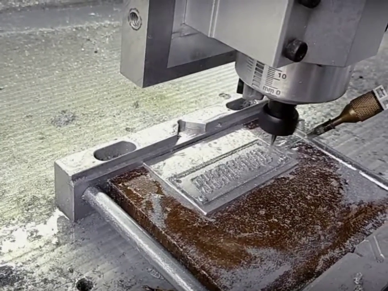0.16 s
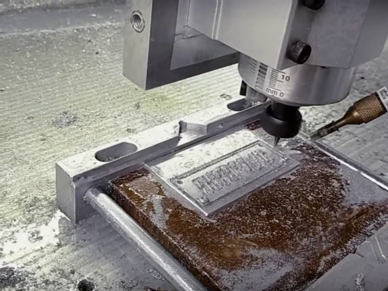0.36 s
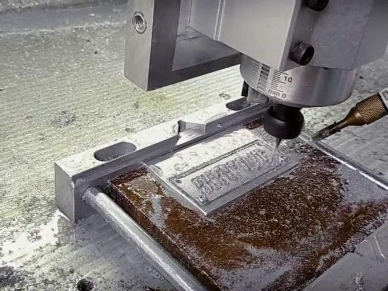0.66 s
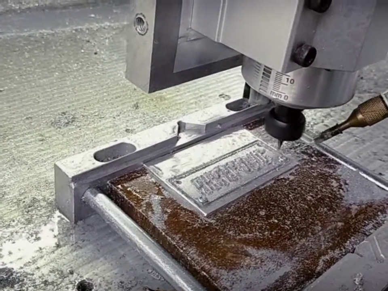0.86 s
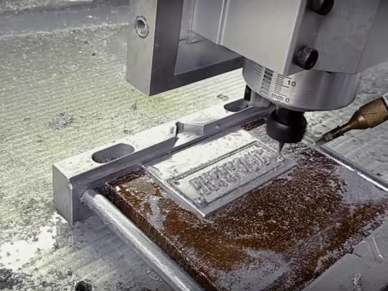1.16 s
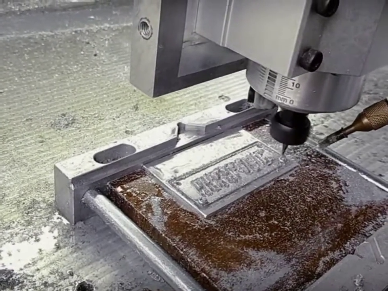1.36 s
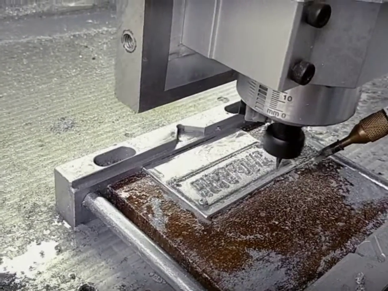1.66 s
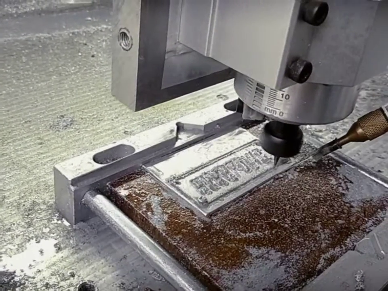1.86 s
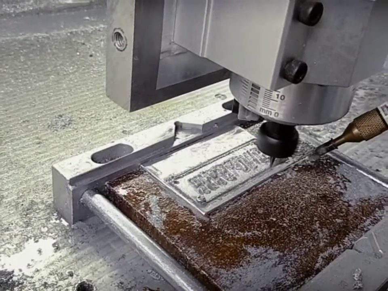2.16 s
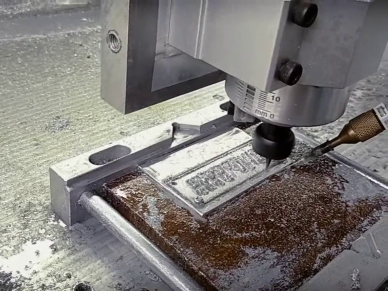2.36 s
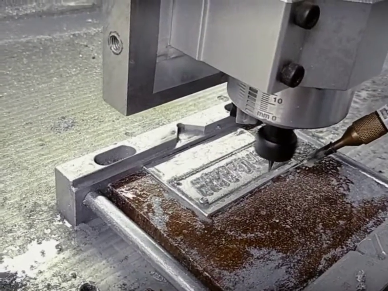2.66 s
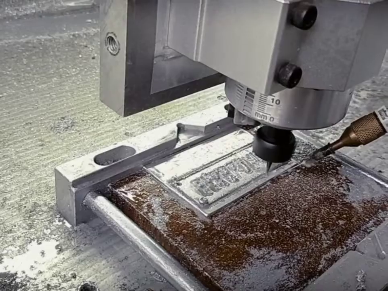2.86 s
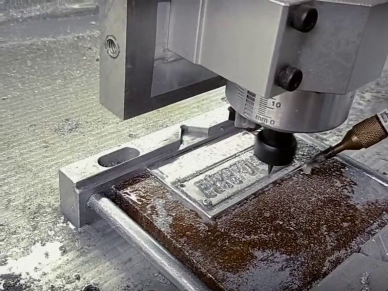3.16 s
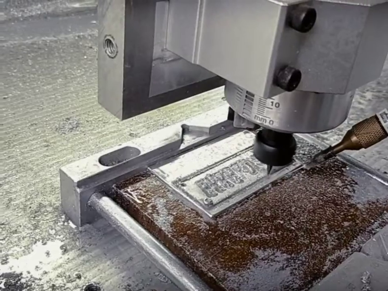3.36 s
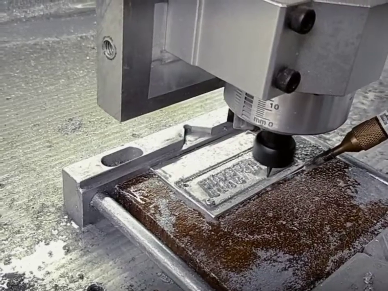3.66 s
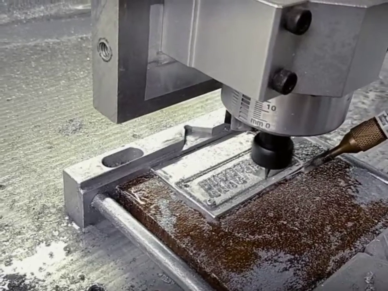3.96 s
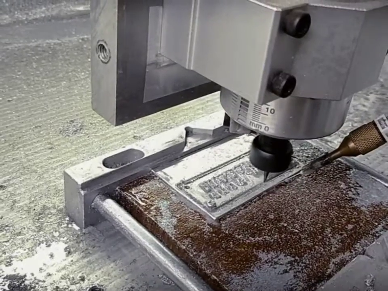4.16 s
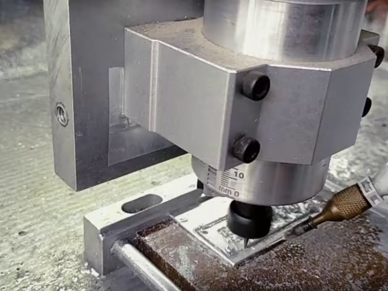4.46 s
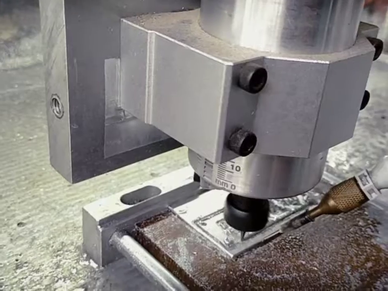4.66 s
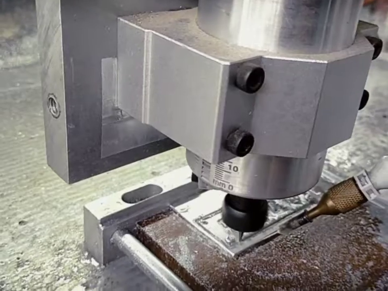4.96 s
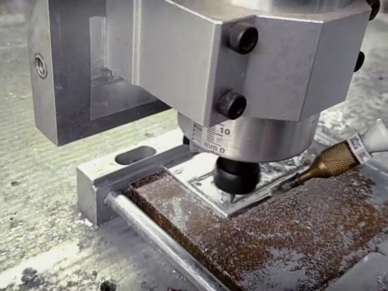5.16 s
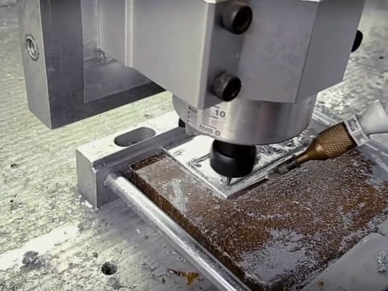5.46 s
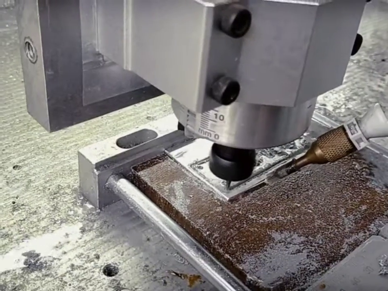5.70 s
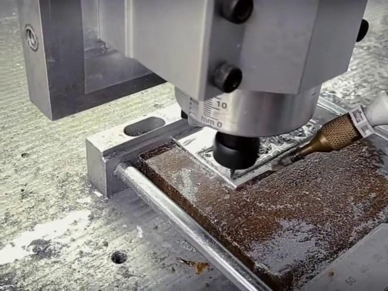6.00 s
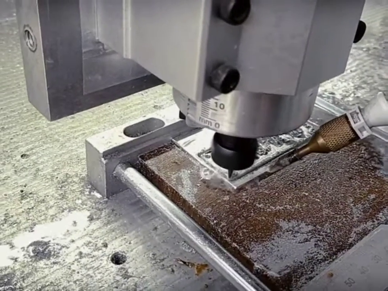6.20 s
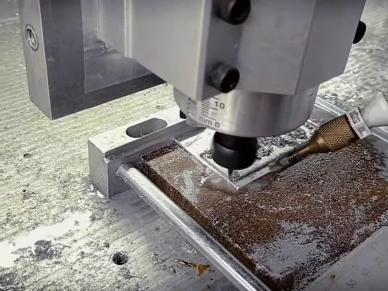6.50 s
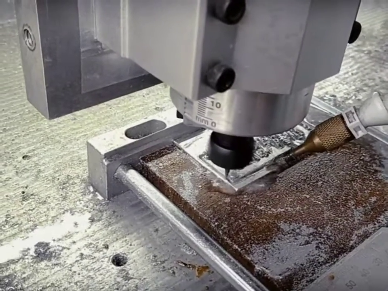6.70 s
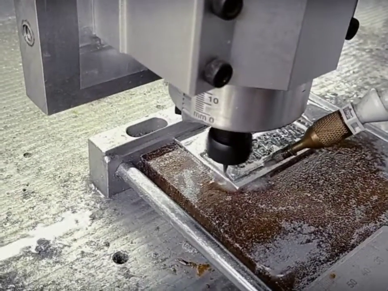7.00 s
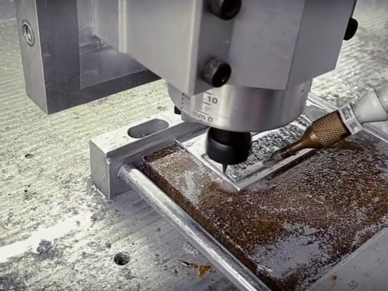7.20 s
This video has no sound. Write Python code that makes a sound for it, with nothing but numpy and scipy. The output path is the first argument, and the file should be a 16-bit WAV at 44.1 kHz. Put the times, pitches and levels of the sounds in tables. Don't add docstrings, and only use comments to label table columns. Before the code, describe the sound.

A small milling spindle whines steadily at high pitch close by, its cutter buzzing through a metal plate amid fine chip and air hiss.

```python
import sys
import numpy as np
from scipy import signal
from scipy.fft import rfft, irfft
from scipy.io import wavfile
from scipy.ndimage import uniform_filter1d

SR = 44100
rng = np.random.default_rng(int(sys.argv[2]) if len(sys.argv) > 2 else 0)


def wav_record(signal):
    frames = np.transpose(np.atleast_2d(signal))
    bounded = np.clip(frames, -1, 1)
    quanta = np.round(bounded * 32767).astype(np.int16)
    wavfile.write(sys.argv[1], SR, quanta)


def gain_from_decibels(decibels):
    exponent = np.asarray(decibels, float) / 20
    return 10 ** exponent


N = 323694


def evened(x):
    return x / np.sqrt(np.mean(x ** 2) + 1e-20)


def hiss():
    return rng.standard_normal(N)


def curve(rows):
    times_s, values = np.transpose(rows)
    return np.interp(np.arange(N) / SR, times_s, values)


def bumps(rows, size=0):
    t = np.arange(0, N + 64, 64) / SR
    total = np.zeros(len(t))
    for row in rows:
        total += row[size + 2] * np.exp(-((t - row[0]) / row[1]) ** 2)
    return np.interp(np.arange(N) / SR, t, total)


def drift(rate_hz):
    steps = rng.standard_normal(N // 64 + 2)
    smooth = signal.lfilter(*signal.butter(2, rate_hz, fs=SR / 64), steps)
    return np.interp(np.arange(N), np.arange(len(steps)) * 64, evened(smooth))


def resonate(x, hz, width_hz):
    pole = np.exp(np.pi * (2j * hz - width_hz) / SR)
    twice = [1, -2 * pole, pole ** 2]
    once = signal.lfilter([1], twice, x)
    return evened(signal.lfilter([1], twice, once).real)


# (start_s, second_view_share 0-1, shank_ring_db, chip_hiss_db)
PASSES = [(0, 0.2, -46, -53), (.45, 0.15, -46, -60), (1.1, 0.18, -45, -52), (1.68, 0.2, -46, -50),
          (2.7, 0.16, -46, -47.5), (4.514, .9, -58, -60), (4.6, 0.67, -50, -60), (4.752, 0.84, -50, -63),
          (5.3, 0.86, -50, -53), (5.93, 1, -55, -62), (6.08, 1, -56, -62.5)]


def by_pass(values, table=PASSES):
    blend_s = 0.044
    starts = [int(row[0] * SR) for row in table]
    held = np.repeat(np.asarray(values, float), np.diff([0] + starts[1:] + [N]))
    jump = next(int(row[0] * SR) for row in PASSES if row[1] > .5)
    parts = np.split(held, [jump])
    return np.concatenate([uniform_filter1d(part, int(blend_s * SR), mode="nearest") for part in parts])


# (time_s, turns_hz)
SPEED = [(0.05, 427.8), (0.9, 428.6), (1.8, 429.3), (2.1, 428.7), (2.7, 428.5), (3.6, 428.8), (4.3, 429.2),
         (4.45, 430.3), (4.6, 428.6), (4.85, 429.0), (5.2, 428.2), (5.9, 429.0), (6, 429.5), (6.27, 430.2),
         (6.4, 431.5), (7.3, 431.4)]
# (start_s, time_to_top_s, rise_hz)
RUN_UPS = [
    (3.78, .065, 7.2),
    (6.04, .11, 3.0),
]


def shaft():
    hz = curve(SPEED) + 0.211 * drift(5.32) + 0.38 * drift(37.6)
    for start_s, top_s, rise_hz in RUN_UPS:
        u = np.maximum(np.arange(N) / SR - start_s, 0) / top_s
        hz = hz + rise_hz * (u * np.exp(1 - u)) ** 2
    return np.cumsum(hz) / SR


ALONG = (-47.5, -46, -50.5, -42.5, -48.5, -47, -43, -36.5, -40, -49, -52.5, -58.5, -60, -52.5, -62, -53,
         -57)
ACROSS = (-46, -55, -38, -47, -55, -51, -46, -46, -39.5, -48, -53, -62, -66, -55, -61, -48, -53.5)
LIFTED = (-51.5, -56, -33.5, -48, -43.5, -48, -58, -43, -44, -40.5, -57.5, -64, -62, -52.5, -60, -44.5, -53)
EDGE = (-41.5, -50, -41.5, -42.5, -37.5, -43, -42, -50, -58, -56, -58.5, -58.5, -59.5, -58, -60, -59.5, -60)
CORNER = (-43, -45.5, -40.5, -48, -40, -36.5, -39, -44.5, -50, -62.5, -66, -59, -56, -58.5, -71, -53, -62)
# (start_s, order_levels)
LEGS = [
    (0, ALONG),
    (1.68, ACROSS),
    (3.79, LIFTED),
    (3.98, ACROSS),
    (4.514, EDGE),
    (6.08, CORNER),
]
# (order, centre_s, half_length_s, lift_db)
SWELLS = [(1, 1.64, 0.16, -3.5), (4, 1.63, .08, -4), (7, 4.45, .06, -10), (5, 7.32, 0.17, -7),
          (4, 5.34, 0.018, 6), (6, 4.53, .015, 6), (6, 6.34, 0.056, 3.5), (5, 4.42, .08, 7),
          (10, 3.54, .15, -3.5), (3, 4.64, .08, 2), (5, 4.55, 0.015, 4), (5, 4.575, 0.013, -13),
          (4, 4.645, .04, 10), (4, 4.56, .03, -4), (6, 4.62, .05, -8), (10, 3.83, .04, -3),
          (5, 4.78, 0.044, -8), (3, 1.72, .04, -4), (3, 2.25, 0.11, -2), (4, 4.8, 0.043, -5),
          (4, 5.07, 0.031, -7), (4, 5.29, 0.027, 3), (4, 5.46, .04, 6.5), (4, 5.54, 0.023, -10),
          (4, 5.62, .03, 5), (6, 5.1, .03, 4), (9, 3.96, 0.051, -6), (1, 3.89, .025, -6)]
# (order, start_s, end_s, lift_db)
HOLDS = [(5, 0, .5, 3), (6, 0, .45, -4.5), (7, 0, .45, -3.5), (11, 0, .45, 3.5), (17, 0, .45, 3.5),
         (6, 1.3, 1.76, 4), (7, 1.7, 1.68, 2), (10, 0.9, 2.3, 3), (5, 1.5, 2.7, 5), (17, 1, 2.7, -6),
         (9, 1.68, 2.53, -1.5), (3, 4.5, 4.75, 2), (7, 4, 4.51, -3), (10, 4, 4.64, 3.5),
         (11, 3.98, 4.51, -8), (15, 3, 4.51, 5), (17, 3.98, 4.51, 4), (16, 1.5, 2.9, -3.5),
         (14, 0, .9, 2.5), (11, 5, 4.75, 4), (6, 5.93, 6.08, 5), (16, 5.93, 6.08, 7), (4, 5.93, 6.08, 2.5),
         (9, 5.93, 6.08, 5), (11, 5.5, 6.36, -7), (5, 6.08, 6.4, -8), (5, 6.4, 6.53, -4), (8, 6, 6.36, -7),
         (12, 6.5, 6.36, -9), (10, 6.08, 6.36, 5)]
# (order, start_s, end_s, level_db)
WHISTLES = [
    (19, 0, 5, -58.5),
    (20, 0, 5, -60),
    (23, 1.5, 4.46, -61),
    (33, 1.7, 4.46, -60),
    (19, 2.5, 7.34, -62),
    (24, 6.5, 7.34, -66),
    (35, 6.4, 7.34, -62),
]


def orders(turns):
    out = np.zeros(N)
    order_unrest = (0.5, 0.84, 0.83, 1.15, 0.79, 1.25, 0.89, 0.77, 0.75)
    for k in range(len(ALONG)):
        order = k + 1
        unrest = order_unrest[k] if k < 9 else 1.3
        level_db = by_pass([levels[k] for _, levels in LEGS], LEGS)
        level_db += unrest * (0.96 * drift(9.4) + 1.2 * drift(20.0))
        level_db += bumps([row[1:] for row in SWELLS if row[0] == order])
        for which, start, end, db in HOLDS:
            if which == order:
                level_db += curve([(start - .02, 0), (start + .02, db), (end - .02, db), (end + .02, 0)])
        lag = -.27 * order ** 2 + 0.13 * unrest * drift(13.0)
        out -= np.sqrt(2) * gain_from_decibels(level_db) * np.cos(2 * np.pi * order * turns - lag)
    for order, start, end, db in WHISTLES:
        gate = curve([(start - .05, 0), (start, 1), (end, 1), (end + .05, 0)])
        tone = np.sqrt(2) * np.cos(2 * np.pi * order * turns)
        out += gain_from_decibels(db + 2.034 * drift(12.0)) * gate * tone
    return out


# (pitch_hz, width_hz, level_db)
JET = (14650, 8500, -48)
# (centre_s, half_length_s, tip_ring_db, shank_lift_db)
CHATTER = [(4.65, .03, -82, 6), (4.82, .015, -57.5, 7), (5.012, 0.039, -62, 4), (5.144, 0.025, -44, 1),
           (5.185, 0.01626, -50, 7.5), (5.235, 0.047, -48, 4), (5.293, 0.028, -48, 5.5),
           (5.36, .022, -48, 1), (5.4, 0.017, -52, 3), (5.47, .02, -58, -5), (5.515, .035, -45, 3),
           (5.58, .025, -46, 3), (5.615, 0.01306, -46, 7.5), (5.665, .025, -47, 2), (5.702, .02, -54, 6),
           (5.754, .022, -47, 4.5), (5.81, .018, -50, 5.5), (5.87, .03, -54, 4), (5.915, .015, -58, 1)]


def cutter(turns, flicker):
    strikes = evened(sum(np.cos(2 * np.pi * k * turns + 0.1192 * k * k) for k in range(14, 38)))
    puffs = evened((1.2 + np.exp(-(turns % 1) / .3)) * hiss())
    t, tip_gain, lift_db = np.arange(N) / SR, np.zeros(N), np.zeros(N)
    ticks = drift(60.)
    for s, half, tip_db, shank_db in CHATTER:
        near = slice(int((s - 2 * half) * SR), int((s + 2 * half) * SR))
        burst = np.exp(-((t[near] - s) / half) ** 2)
        tip_burst = burst * gain_from_decibels(tip_db - 2.0 + 2.5 * ticks[near])
        tip_gain[near] = np.maximum(tip_gain[near], tip_burst)
        lift_db[near] = np.maximum(lift_db[near], 1.22 * burst * shank_db)
    shank_gain = gain_from_decibels(by_pass([row[2] for row in PASSES]) + lift_db)
    chip_gain = gain_from_decibels(by_pass([row[3] for row in PASSES]))
    # pitch_hz, width_hz, share of strikes 0-1, gain
    rings = [(7970, 1630, 0.19, shank_gain), (14350, 2100, .08, chip_gain), (11500, 2100, .4, tip_gain)]
    jet_hz, jet_width_hz, jet_db = JET
    out = gain_from_decibels(jet_db) * resonate(hiss(), jet_hz, jet_width_hz)
    for hz, width_hz, share, gain in rings:
        share = np.clip(share + 0.037 * lift_db, 0, 1)
        drive = share * strikes * gain_from_decibels(1.4 * drift(25.)) + (1 - share) * puffs
        out += gain * resonate(drive, hz, width_hz)
    return out * gain_from_decibels(1.04 * flicker)


# (start_s, pitch_hz, fade_by_60_db_s, level_db)
TOUCH = (3.893, 3900, .035, -27)


def touch():
    start_s, hz, fade_s, db = TOUCH
    t = np.maximum(np.arange(N) / SR - start_s, 0)
    return gain_from_decibels(db - 60 * t / fade_s) * np.sin(2 * np.pi * hz * t)


# (pitch_hz, level_db per Hz)
AIR_FIRST = [(300, -95.5), (450, -82.5), (650, -83.5), (850, -80), (1200, -66.5), (1450, -72),
             (1950, -74.5), (2250, -74), (2900, -81.5), (3700, -74), (4600, -79), (6700, -80.5),
             (9600, -85.5), (15500, -92.5)]
# (pitch_hz, level_db per Hz)
AIR_SECOND = [(300, -95.5), (450, -87), (650, -86), (850, -76.5), (1200, -66.5), (1450, -70.5), (1950, -75),
              (2250, -66.5), (2900, -73), (3700, -81), (4600, -88), (6700, -86), (9600, -91.5),
              (15500, -85.5)]


def air(turns, flicker):
    hz, t, z = signal.stft(hiss(), SR, nperseg=1024, noverlap=768)

    def spectrum(rows):
        points_hz, levels_db = np.transpose(rows)
        return np.interp(np.log(hz + 1), np.log(points_hz), levels_db)

    share = np.interp(t * SR, np.arange(N), by_pass([row[1] for row in PASSES]))
    patches = uniform_filter1d(rng.standard_normal(z.shape), 8, 0)
    patches = evened(uniform_filter1d(patches, 5, 1))
    gusts = np.clip(hz / 5000, 0, 1)[:, None] * np.interp(t * SR, np.arange(N), flicker)
    field_db = np.outer(spectrum(AIR_FIRST), 1 - share) + np.outer(spectrum(AIR_SECOND), share)
    field_db += patches + 1.14 * gusts
    shaped = z * gain_from_decibels(field_db) * np.sqrt(SR / 2)
    noise = signal.istft(shaped, SR, nperseg=1024, noverlap=768)[1][:N]
    return noise * (1 + 0.28 * np.cos(2 * np.pi * turns))


# (pitch_hz, width_hz, level_db)
BEARING = (528, 22.9, -57)
# (centre_s, half_length_s, rumble_lift_db, drone_lift_db)
HANDLING = [(.3, .3, 1.5, 10.5), (.63, .05, 0.5, 8), (.96, .08, 4, 12), (1.45, .12, 4, 10),
            (3.82, 0.057, 1.5, 10), (4.3, 0.25, 0.5, 14.5), (4.6, .05, 14.5, -5), (4.95, .15, 5, 11.5),
            (5.3, 0.14, 9, 6), (5.68, 0.25, 14, 10), (6.22, 0.11, 10, 17), (6.44, 0.17, 15, 13.5),
            (6.85, .08, 10, 0.5), (7.11, 0.088, 9, 4)]


def low_end():
    lumps_db, lumps_hz = 3, 4.8
    rumble_db = -74.5 + bumps(HANDLING) + lumps_db * drift(lumps_hz)
    drone_db = -80.5 + bumps(HANDLING, size=1) + lumps_db * drift(lumps_hz)
    rumble = resonate(hiss(), 44.5, 93) * gain_from_decibels(rumble_db)
    drone = resonate(hiss(), 213, 250) * gain_from_decibels(drone_db)
    hz, width_hz, db = BEARING
    wavering_hz = hz + 0.249 * width_hz * drift(9.1)
    whirr = np.sqrt(2) * np.cos(2 * np.pi * np.cumsum(wavering_hz) / SR)
    fuzz = 0.47 * resonate(hiss(), hz, width_hz)
    return rumble + drone + gain_from_decibels(db - 2.0) * (whirr + fuzz)


# (centre_s, half_length_s, lift_db)
BITES = [(1.49, .04, 2), (2.35, .05, 3.5), (2.41, .015, -7), (2.86, .05, -8), (2.94, .025, 7),
         (3.27, .08, 1.5), (3.44, .03, -6), (3.52, .05, 3.5), (4.21, .05, 1), (4.67, .04, -4),
         (4.84, 0.013, -3), (4.99, 0.051, 6), (5.25, .04, 4.5), (5.325, 0.017, -12), (5.37, 0.028, 7),
         (5.64, .03, -4), (6.19, .03, 3), (6.66, .06, -6)]


def scene():
    turns = shaft()
    flicker = 0.4 * bumps(BITES) + 0.85 * drift(35.0)
    throb = 1 + .16 * np.cos(2 * np.pi * np.arange(N) / 1024 + .9)
    whine = orders(turns) * gain_from_decibels(0.41 * flicker)
    noises = throb * (air(turns, flicker) + cutter(turns, flicker))
    mono = whine + noises + touch() + low_end()
    return np.array([mono, mono])


def top_cut(x):
    return signal.sosfilt(signal.butter(12, 16340, fs=SR, output="sos"), x)


EDGE_HZ = 15730
# (centre_s, low_hz, high_hz, level_db)
SPLITS = [
    (1.24, 9000, 10500, -60),
    (1.24, 13200, 14600, -55),
    (4.16, 8300, 9700, -53),
    (4.16, 10400, 11800, -60),
    (4.16, 14600, 16000, -56.5),
    (4.86, 6972, 8400, -54),
    (4.95, 11000, 12500, -57),
    (6.21, 14500, 16000, -56.5),
]


def record(dry):
    low_pass = signal.firwin(2047, EDGE_HZ, window=("kaiser", 7), fs=SR)
    hz, side = np.fft.rfftfreq(2048, 1 / SR), np.zeros(N)
    for s, low_hz, high_hz, db in SPLITS:
        band = irfft(rfft(rng.standard_normal(2048)) * (hz > low_hz) * (hz < high_hz))
        start = int(s * SR) - len(hz)
        side[start:start + len(band)] += gain_from_decibels(db) * evened(band) * np.hanning(len(band)) ** .5
    limited = signal.oaconvolve(dry, low_pass[None], "same")
    return top_cut(limited + [side, -side])


dry = scene()
out = record(dry)
wav_record(out)
```